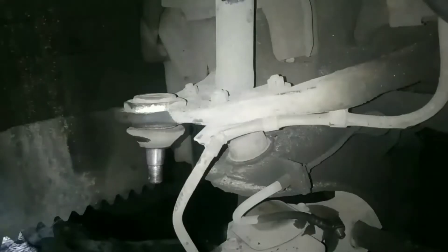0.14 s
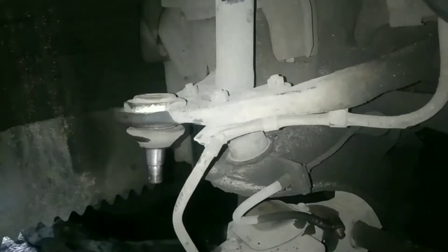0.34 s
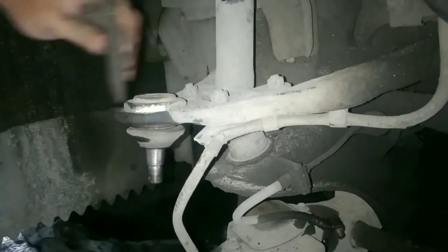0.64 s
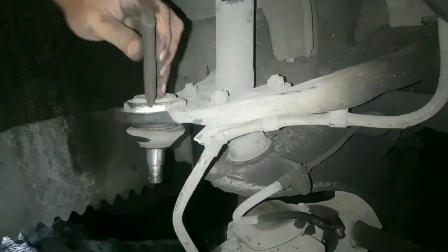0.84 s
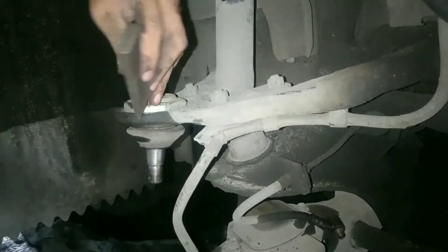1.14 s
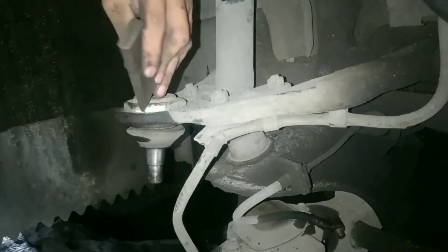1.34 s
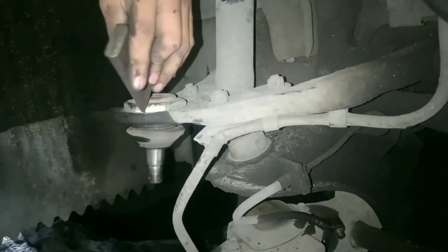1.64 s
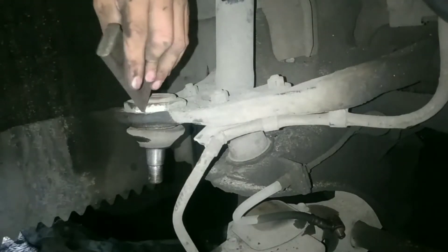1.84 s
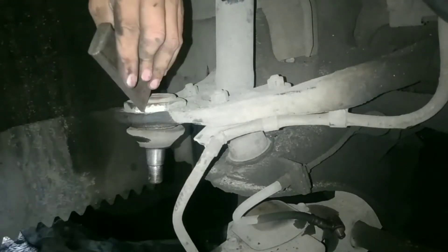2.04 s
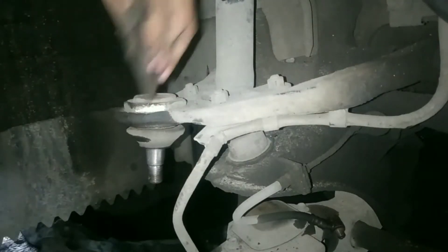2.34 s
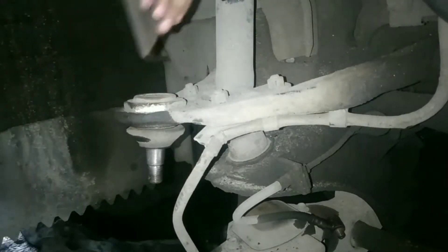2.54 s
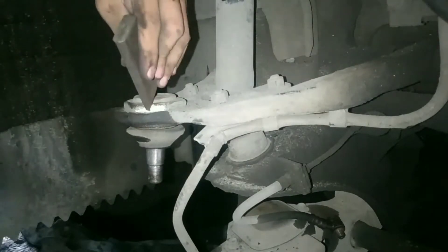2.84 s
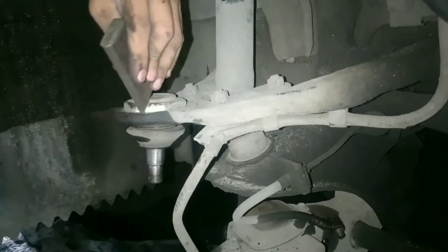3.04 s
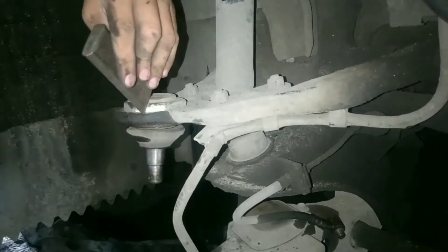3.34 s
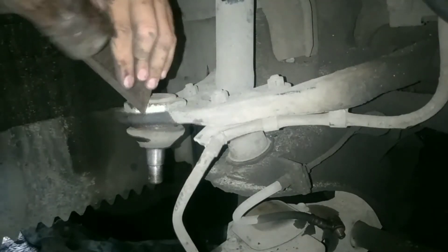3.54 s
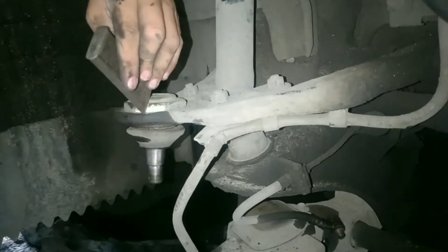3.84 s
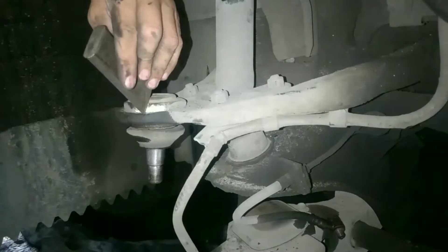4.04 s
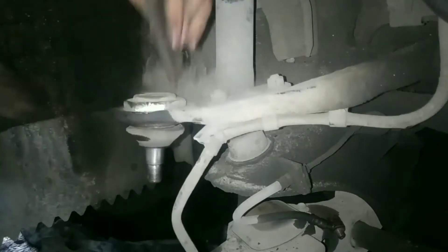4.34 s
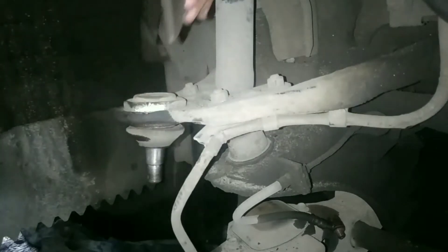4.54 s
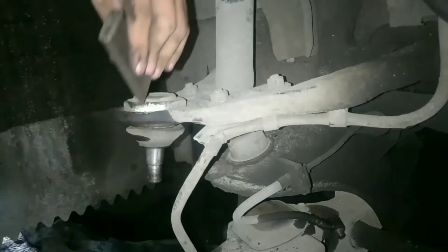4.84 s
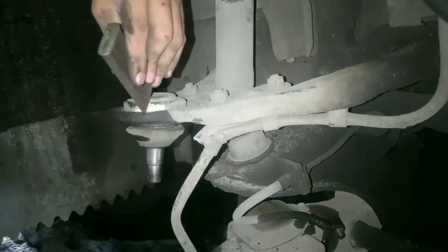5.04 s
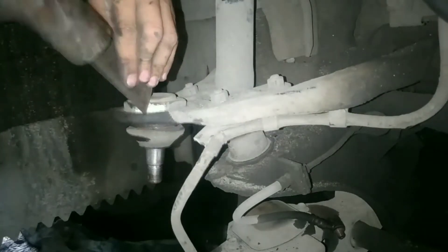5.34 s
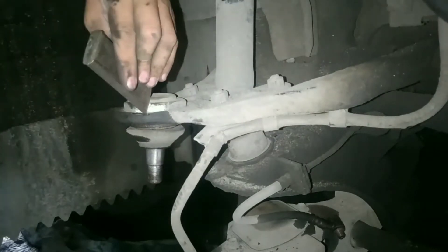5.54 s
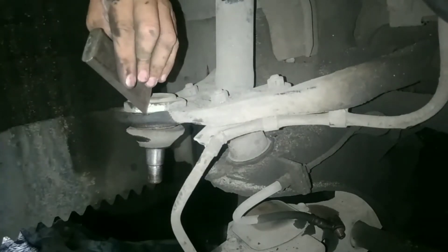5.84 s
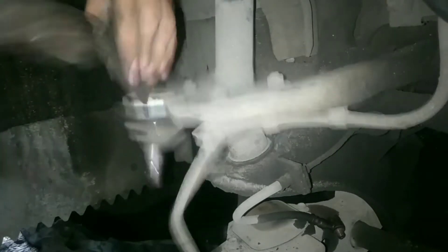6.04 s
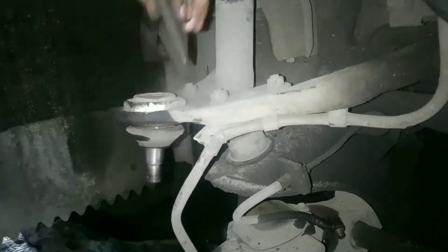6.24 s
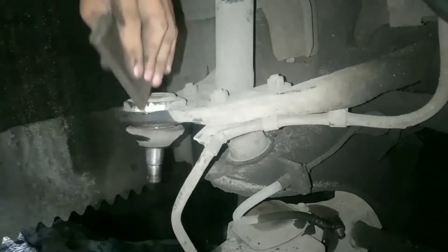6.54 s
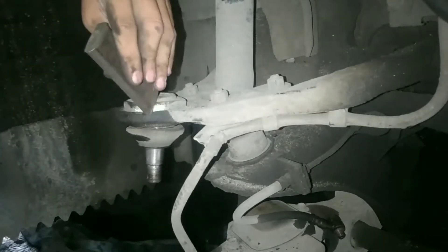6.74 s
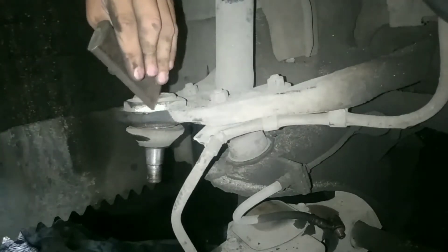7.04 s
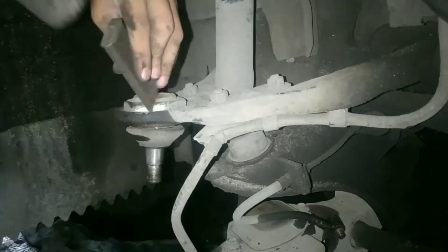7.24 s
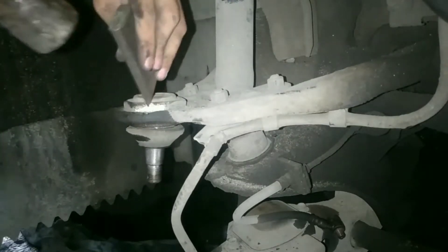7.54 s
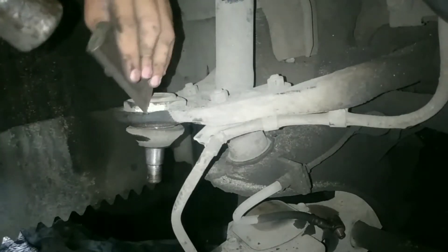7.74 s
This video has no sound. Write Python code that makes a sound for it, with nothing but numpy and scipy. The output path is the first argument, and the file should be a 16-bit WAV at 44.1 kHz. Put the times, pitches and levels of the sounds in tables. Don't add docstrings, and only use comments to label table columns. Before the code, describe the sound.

A hammer cracks against a steel chisel on a car's suspension joint, bright ringing clangs between light taps, rusty rubbing and quiet hall murmur.

```python
import sys
import numpy as np
from scipy import signal
from scipy.fft import rfft, irfft, next_fast_len
from scipy.io import wavfile
from scipy.ndimage import uniform_filter1d

SR = 44100
rng = np.random.default_rng(int(sys.argv[2]) if len(sys.argv) > 2 else 0)


def materialize(psi):
    bounded = np.clip(np.atleast_2d(psi).T, -1, 1)
    quanta = np.round(bounded * 32767).astype(np.int16)
    wavfile.write(sys.argv[1], SR, quanta)


def amplitude_ratio(level_db):
    exponent = np.asarray(level_db, float) / 20
    return 10 ** exponent


N = 347463

# frequency_hz, level_db
MURMUR_SPECTRUM = [(15, 6.5), (40, 2), (100, -9), (250, -11), (600, -15), (1300, -14), (2500, -22.5),
                   (4500, -30), (9000, -30), (16000, -36.5)]
# pitch_hz, drift_width_hz, level_db
MACHINE_TONES = [(1466, 4.3, -54), (477, 14, -66), (132, 10, -67)]
# frequency_hz, likeness (-1 to 1)
LIKENESS = [(60, 1), (130, 0.94), (290, 0.8), (640, 0.36), (1410, -0.46), (3100, 0.22), (6820, 0.3),
            (15000, -0.03)]
# frequency_hz, t60_s
HALL_DECAY = [(60, 1.2), (200, .8), (600, 0.64), (2000, 0.48), (6000, 0.47), (12000, 0.34)]
# start_s, fine_hiss_db, coarse_scrape_db
RUBS = [
    [(0.0, -48, -65), (0.01, -45, -55.5), (0.108, -68.5, -73), (0.146, -49, -64), (0.512, -66, -75),
     (0.548, -49, -76), (0.58, -60, -55), (0.69, -69, -84), (0.78, -68.5, -60), (0.864, -67, -81),
     (1.014, -58, -63), (1.078, -45, -46), (1.146, -43, -52.5), (1.22, -72.5, -86), (1.34, -43, -72.5),
     (1.522, -61.5, -71.5), (1.628, -52, -60.5), (1.654, -46.5, -73.5), (1.674, -61, -70.5),
     (1.88, -67.5, -76)],
    [(2.45, -71, -78), (2.782, -66.5, -66), (2.794, -46.5, -44), (2.84, -72.5, -68.5), (2.852, -48, -58.5),
     (2.896, -68.5, -80), (2.942, -61, -54.5), (2.998, -67, -78.5), (3.012, -37.5, -44.5),
     (3.114, -65, -75.5), (3.3, -63.5, -68)],
    [(4.4, -48.5, -63), (4.652, -65, -74), (4.692, -73, -76.5), (4.742, -41.5, -45.5), (4.776, -61, -63),
     (4.856, -68, -67), (5.006, -67.5, -78), (5.026, -57.5, -59), (5.058, -67, -76.5), (5.12, -70, -75.5)],
    [(6.2, -49, -56), (6.372, -57.5, -72), (6.386, -45.5, -51), (6.446, -64, -71), (6.742, -70, -76),
     (6.768, -60, -70), (6.916, -76, -75), (6.946, -50.5, -67), (7.024, -78, -66), (7.056, -55.5, -71),
     (7.16, -60, -54.5), (7.324, -65.5, -77), (7.402, -78.5, -69), (7.424, -44, -43.5), (7.472, -64.5, -74),
     (7.632, -75, -80), (7.668, -52, -65), (7.76, -57.5, -72)],
]
# start_s, pitch_hz, level_db, t60_s
FLAKE = (3.5, 11507, -50, 1.5)
# start_s, level_db, arm_db, grit_db, length_s, grip_damping (factor on t60)
TICKS = [(0.582, -37, -6, -20, 0.0055, 0.9), (0.767, -39.5, -2, -23.5, 0.004, 1),
         (1.078, -29, -11.5, -7.5, 0.0039, 0.86), (2.714, -39.5, -13, -21.5, 0.004, 0.96),
         (2.792, -26.5, -21, -24.5, 0.0046, 0.86), (2.849, -32.5, -25.5, -16.5, 0.004, 0.9),
         (2.933, -36.5, -18, -22.5, 0.004, 1), (3.011, -21, -27, -5, 0.0046, 0.84),
         (3.04, -30, -22.5, -9.5, 0.004, 0.88), (4.264, -29.5, -13, -7.5, 0.004, 0.9),
         (4.364, -39, -11.5, -8.5, 0.004, 0.9), (4.723, -26.5, -21, -21, 0.0043, 0.97),
         (4.74, -28.5, -16, -22.5, 0.004, 0.8), (6.234, -37, -14, -11.5, 0.004, 0.9),
         (6.386, -34, -10.5, -12, 0.004, 0.9), (6.775, -38.5, -14.5, -18.5, 0.0041, 0.95),
         (6.946, -38, -12, -13, 0.0044, 0.83), (7.174, -35.5, -15, -17, 0.0038, 0.9),
         (7.422, -26, -19, -22, 0.0043, 0.82)]
# pitch_hz, level_db, t60_s
GRIPPED_CHISEL = [(1595, -3.5, 0.054), (1800, -2, .06), (2638, -1, 0.053), (4580, -11.5, .06),
                  (5650, -3.5, .07), (6060, -6.5, 0.043), (9060, -14, .06), (14750, -18, .05)]
# pitch_hz, level_db, t60_s
PARTS = [
    [(8353, 5.5, .22), (8380, 4, 0.21)],
    [(8673, 0.5, 0.24), (9110, -10, .25)],
    [(3042, 0, 0.57), (2966, -6, 0.33), (3100, -8.5, .3)],
    [(6577, -5.5, 0.42), (6590, -1, .35), (6664, 0.5, 0.35), (6688, 0, 0.37), (6700, -6, 0.39),
     (6800, -8, 0.27)],
    [(10450, -9.5, .25), (10580, -3, .3), (10650, -2.5, 0.27), (10850, -6.5, .25), (10800, -9, .2),
     (14330, -2, .2)],
    [(521, -4, .5), (576.4, 0.5, 0.46), (770, -9.5, .4), (1077, -2, .6), (1600, -8.5, 0.16),
     (1846, -12, .35)],
]
# pitch_hz, level_db, t60_s
CAR_BODY = [(86.8, -4.5, .9), (125.2, -3.5, .8), (155.7, -8.5, 0.85), (181, -1, .7), (229, -6.5, .6),
            (262.2, -2.5, .6), (356, -7, 0.6)]
# frequency_hz, level_db
CLANG_SPECTRUM = [(100, -3.5), (400, -5), (1000, -2.5), (2500, -2.5), (4000, -9), (5500, -5.5), (7500, 3.5),
                  (9500, -6.5), (12000, -11), (16000, -10)]
# start_s, force_db, skid_of_tip_s, clang_t60_s, brightness_db_per_octave, car_thud_db
BLOWS = [
    (1.926, -2, 0.015, 0.14, -0.16, -8.5),
    (3.326, -11.5, 0.015, 0.15, -1.97, -7.5),
    (3.99, 6.5, 0.015, 0.13, 0.42, -7),
    (5.144, -8, 0.015, 0.14, -2.06, -13),
    (5.825, 7, 0.015, 0.14, 0, -6),
    (7.789, -7, 0.013, 0.11, -0.05, -14.5),
]
# head_low_db, head_high_db, chisel_bend_1_db, chisel_bend_2_db, chisel_bend_3_db, arm_db
RINGS = [
    (-1.5, -6, -8.5, -8.5, -8.5, -17),
    (-15.5, -7.5, -25.5, -11, -22.5, -11.5),
    (-8, 4, -19, -15.5, -27.5, -11.5),
    (-3.5, -7.5, -23, -13, -24, -10),
    (-20, -18.5, -21, -4.5, -6.5, -10.5),
    (-20, -23, -28.5, 0, -22.5, -14),
]
# pitch_hz, sharpness_q, level_db
PORTS = [(7040, 3.65, -1.35), (10790, 4.02, -1.05)]
# start_s, length_s, left, right (full scale = 1)
BIAS_KICKS = [
    (1.922, .07, .6, .13),
    (3.322, .05, .025, -.05),
    (3.986, .06, -.13, .01),
    (3.998, .07, .01, .42),
    (4.032, .06, .36, .1),
    (5.142, .05, .025, -.07),
    (5.822, .07, -.12, -.07),
    (7.787, .06, .035, .005),
]


def evened(x):
    return x / np.sqrt(np.mean(x ** 2) + 1e-20)


def read(points, hz):
    f, value = np.transpose(points)
    return np.interp(np.log(hz + 1), np.log(f + 1), value)


def add(mix, start_s, sound):
    part = mix[..., round(start_s * SR):][..., :sound.shape[-1]]
    part += sound[..., :part.shape[-1]]


def band(x, lo_hz, hi_hz):
    return signal.sosfilt(signal.butter(2, [lo_hz, hi_hz], "bandpass", fs=SR, output="sos"), x)


def ring(modes, seconds, damping=0.93):
    hz, db, t60 = np.transpose(modes)[:, :, None]
    t = np.arange(round(seconds * SR)) / SR
    decay = np.log(1000) * t / (t60 * damping)
    turns = np.exp(2j * np.pi * hz * t - decay) * amplitude_ratio(db)
    spread = np.minimum(hz.T / 900, 1)
    phases = np.exp(2j * np.pi * spread * rng.random((2, len(modes))))
    return (phases @ turns).imag


def chatter(length_s):
    t = np.arange(4000) / SR
    fade = np.exp(-(t / max(length_s, 1e-3)) ** 2)
    skips = rng.standard_normal(4000) * (rng.random(4000) < .06) * fade
    skips[0] = 1.5
    return skips[None] / np.linalg.norm(skips)


def murmur():
    frames, hz = N // 512 + 6, np.fft.rfftfreq(2048, 1 / SR)
    a, b, c, d, patches = rng.standard_normal((frames, 1025, 5)).T
    patches = uniform_filter1d(uniform_filter1d(patches, 20, 0), 8, 1)
    patches = evened(patches)
    same = np.clip(read(LIKENESS, hz), -1, 1)[:, None]
    left = a + 1j * b
    right = same * left + np.sqrt(1 - same ** 2) * (c + 1j * d)
    z = np.array([left, right]) * amplitude_ratio(read(MURMUR_SPECTRUM, hz)[:, None] + 0.95 * patches)
    noise = signal.istft(z, nperseg=2048, noverlap=1536)[1][:, :N]
    return amplitude_ratio(-48) * evened(noise)


def machine_hum():
    out = np.zeros((2, N))
    for pitch_hz, width_hz, level_db in MACHINE_TONES:
        drift = evened(uniform_filter1d(rng.standard_normal((2, N)), 6000))
        phase = 2 * np.pi * np.cumsum(pitch_hz + width_hz * drift[0] / 2) / SR
        tone = np.sin(phase) * amplitude_ratio(level_db + 2.7 * drift[1])
        out += tone * np.array([[.8], [np.cos(np.pi * pitch_hz / 1460) * 1.3]])
    return out


def hall(x):
    taps = np.zeros((2, SR))
    at = np.arange(200, SR - 20, 20) + rng.integers(0, 20, (2, (SR - 201) // 20))
    np.put_along_axis(taps, at, rng.choice([-1., 1.], at.shape), 1)
    hz, t, z = signal.stft(taps, SR, nperseg=256)
    same = np.clip(read(LIKENESS, hz), 0, 1)[:, None]
    z[1] = same * z[0] + np.sqrt(1 - same ** 2) * z[1]
    fade = amplitude_ratio(-60 * t / read(HALL_DECAY, hz)[:, None])
    tail = signal.istft(z * fade, SR, nperseg=256)[1]
    return signal.fftconvolve(x, tail / np.linalg.norm(tail[0]), axes=1)[:, :N]


def rubbing():
    t, out = np.arange(N) / SR, np.zeros((2, N))
    bursts_db = 2.5 * rng.exponential(1, N).clip(0, 4)
    grains = rng.standard_normal((2, 2, N)) * amplitude_ratio(bursts_db)
    fine = evened(band(grains[0], 4500, 15500))
    coarse = evened(band(grains[1], 1100, 4000))
    for rows in RUBS:
        start_s, fine_db, coarse_db = np.transpose(rows)
        out += fine * amplitude_ratio(np.interp(t, start_s, fine_db - 8, -120, -120))
        out += coarse * amplitude_ratio(np.interp(t, start_s, coarse_db + 1, -120, -120))
    return out


def tick(row):
    start_s, level_db, arm_db, grit_db, length_s, grip = row
    t = np.arange(round(.2 * SR)) / SR
    grit = band(rng.standard_normal((2, len(t))), 2500, 15500) * amplitude_ratio(-60 * t / (0.067 * grip))
    sound = amplitude_ratio(-11) * ring(GRIPPED_CHISEL, .2, grip)
    sound += amplitude_ratio(arm_db + 6.5) * ring(PARTS[-1], .2, .2)
    sound += amplitude_ratio(grit_db) * grit
    return start_s, amplitude_ratio(level_db) * signal.fftconvolve(sound, chatter(length_s), axes=1)


def suspension_clang(t60_s, bright_db):
    hz = 200 + 16500 * np.sort(rng.random(300)) ** 1.3
    size_db = read(CLANG_SPECTRUM, hz) + bright_db * np.log2(hz / 3000)
    size_db += 3.95 * rng.standard_normal(300)
    modes = np.transpose([hz, size_db - 22, t60_s * rng.uniform(.6, 1.23, 300)])
    return ring(modes, .3)


def blow(row, rings_db):
    start_s, force_db, skid_s, t60_s, bright_db, thud_db = row
    clang = suspension_clang(t60_s, bright_db)
    sound = sum(amplitude_ratio(db - 10) * ring(part, .8) for db, part in zip(rings_db, PARTS))
    sound += amplitude_ratio(thud_db - 16.5) * ring(CAR_BODY, .8)
    add(sound, 0, clang)
    return start_s, amplitude_ratio(force_db) * signal.fftconvolve(sound, chatter(skid_s), axes=1)


def scene():
    work = rubbing()
    for row, rings_db in zip(BLOWS, RINGS):
        add(work, *blow(row, rings_db))
    for row in TICKS:
        add(work, *tick(row))
    add(work, FLAKE[0], ring([FLAKE[1:]], .2))
    return work + amplitude_ratio(-8.5) * hall(work) + murmur() + machine_hum()


def low_pass(x):
    return signal.sosfilt(signal.butter(12, 15770, fs=SR, output="sos"), x)


def record(dry):
    size = next_fast_len(N + 4096)
    hz = np.fft.rfftfreq(size, 1 / SR)
    ports = np.array([amplitude_ratio(db) / (1 - (hz / f) ** 2 + 1j * hz / (f * q)) for f, q, db in PORTS])
    heard = irfft(rfft(dry, size) * ports, size)[:, :N]
    bias = np.zeros((2, N))
    for start_s, length_s, *sides in BIAS_KICKS:
        add(bias, start_s, np.outer(sides, np.hanning(round(length_s * SR))))
    bias = signal.lfilter(*signal.butter(1, 1.9, "highpass", fs=SR), bias)
    return low_pass(np.clip(heard + bias, -.99, .99))


dry = scene()
out = record(dry)
materialize(out)
```